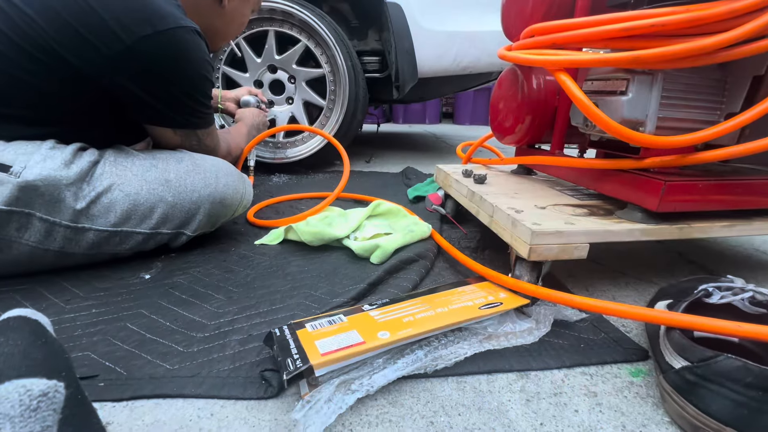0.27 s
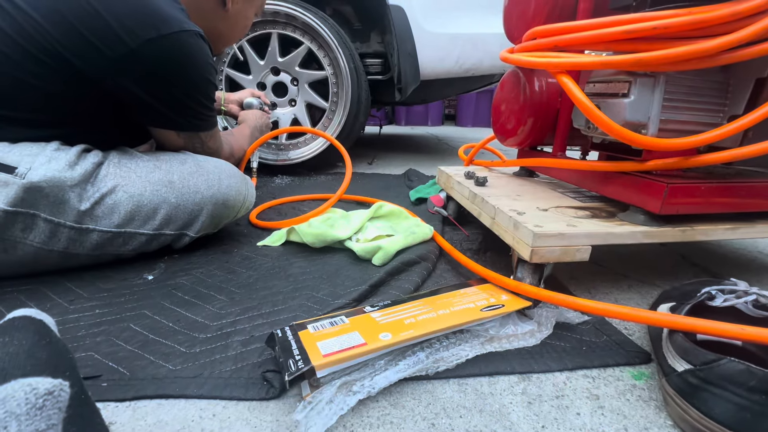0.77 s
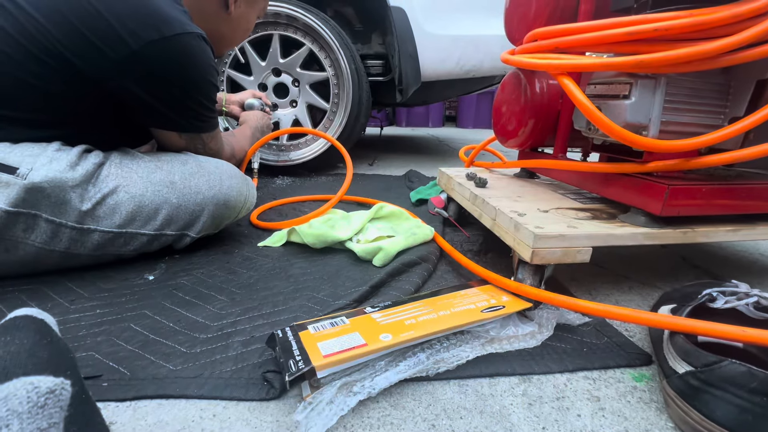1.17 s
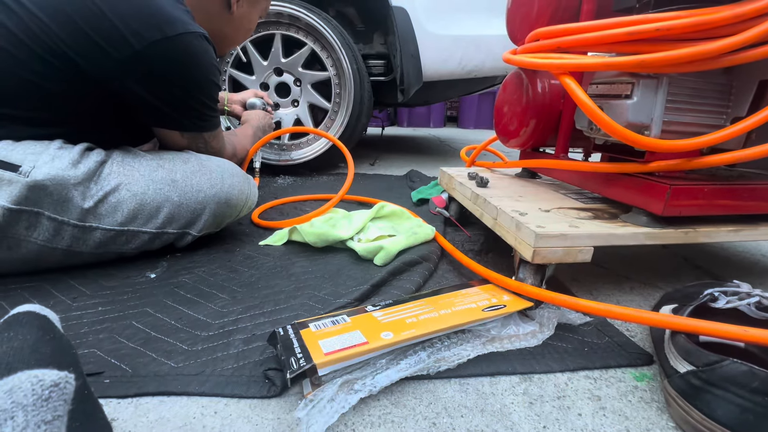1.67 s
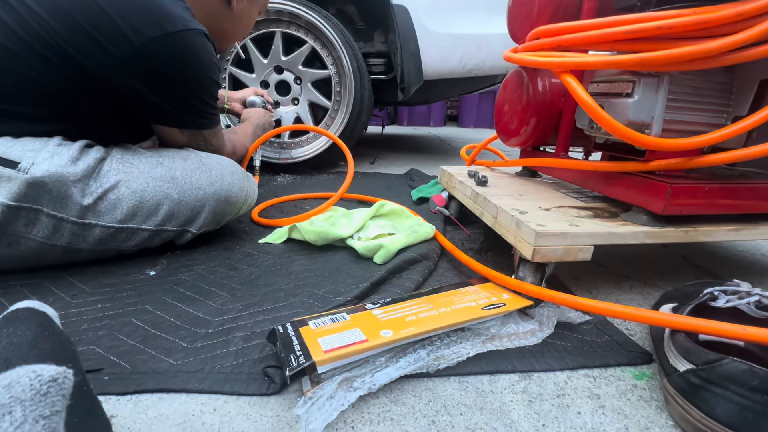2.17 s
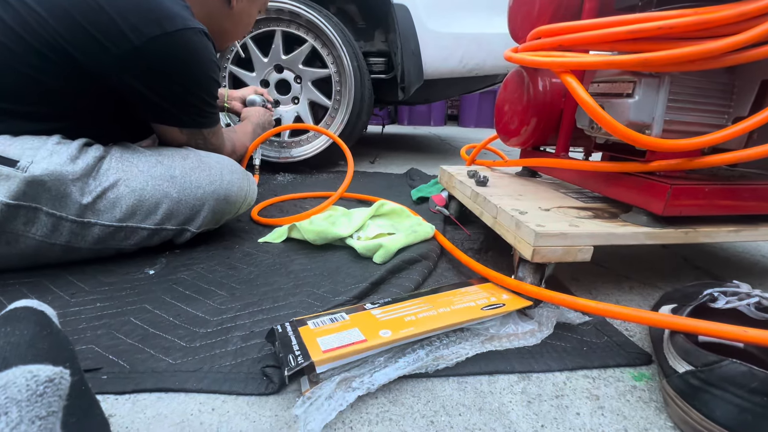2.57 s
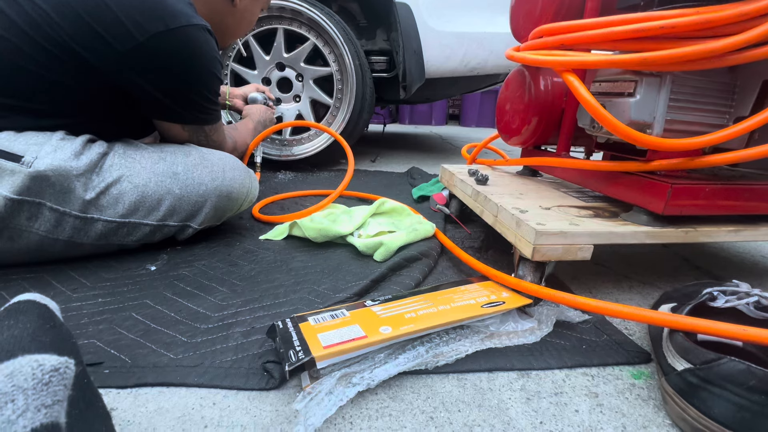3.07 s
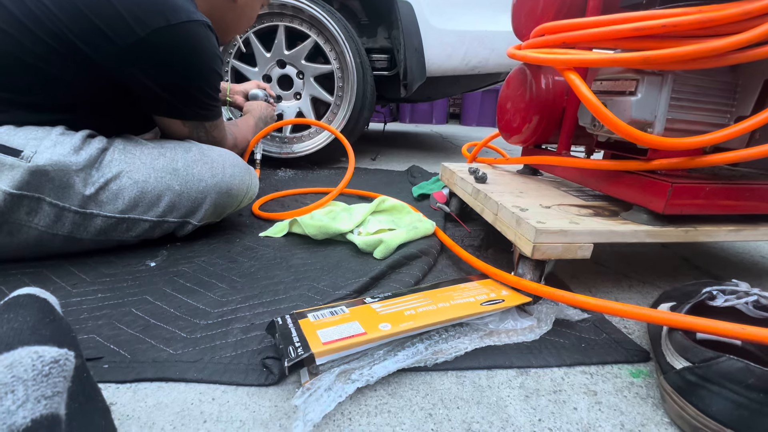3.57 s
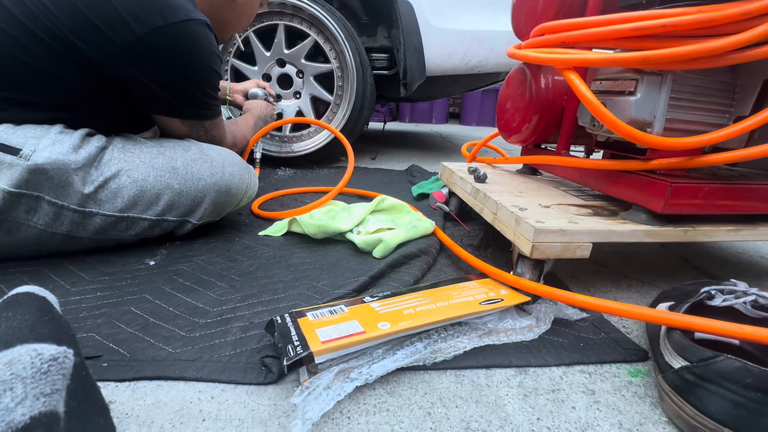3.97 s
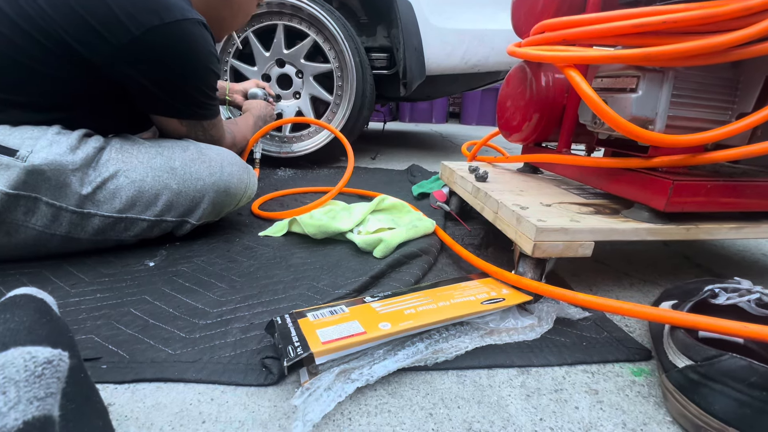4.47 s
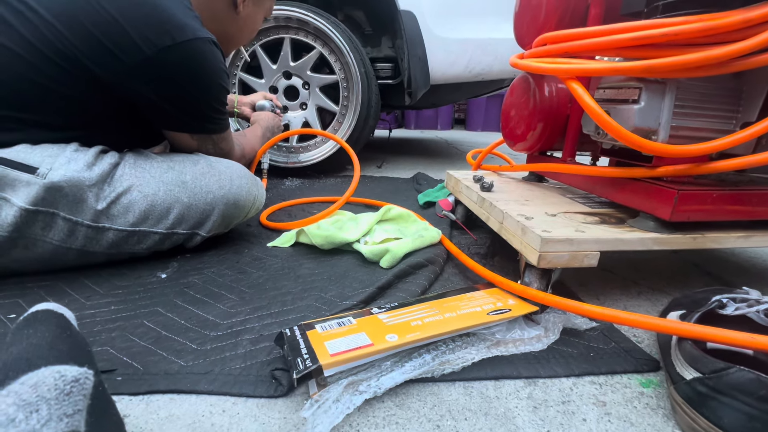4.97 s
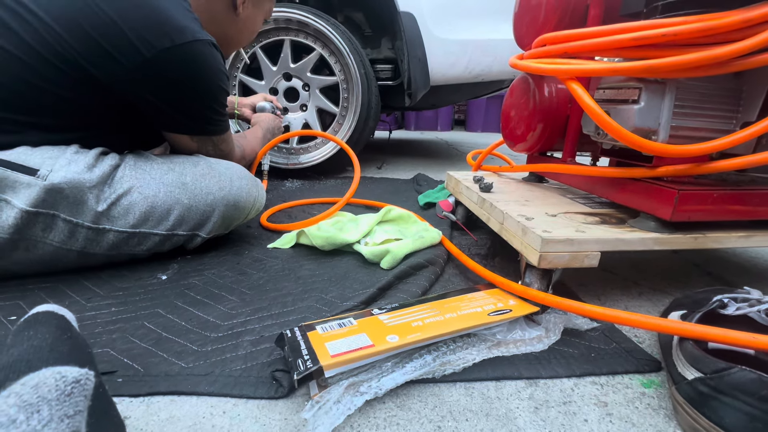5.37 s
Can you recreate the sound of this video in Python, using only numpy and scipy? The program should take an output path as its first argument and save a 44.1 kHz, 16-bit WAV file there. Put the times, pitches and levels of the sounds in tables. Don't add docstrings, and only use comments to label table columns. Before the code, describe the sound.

Fast, harsh metallic buzzing of a pneumatic tool on a car wheel, with hissing air, a short dip, and a motor hum beside it.

```python
import sys
import numpy as np
from scipy import signal
from scipy.fft import rfft, irfft, next_fast_len
from scipy.io import wavfile
from scipy.ndimage import uniform_filter1d

SR = 44100
rng = np.random.default_rng(int(sys.argv[2]) if len(sys.argv) > 2 else 0)


def bounce(signal):
    frames = np.transpose(np.atleast_2d(signal))
    limited = np.clip(frames, -1, 1)
    pcm = np.round(limited * 32767).astype(np.int16)
    wavfile.write(sys.argv[1], SR, pcm)


def gain_from_db(level_db):
    decades = np.asarray(level_db, float) / 20
    return 10 ** decades


N = 248283

# [start_s, level_db]
HAMMER_FORCE = [
    (0, -21.5),
    (.9, -20),
    (2.05, -21),
    (2.99, -20.5),
    (3.29, -32),
    (3.45, -24),
    (3.8, -22),
    (4.05, -23.5),
    (5.12, -21),
    (5.63, -21),
]
# [delay_s, level_db, hiss_decay_s]
BOUNCE_PATTERN = [
    (0, -2.5, 0.00038),
    (.0012, -2, 0.00039),
    (.0036, -6.5, 0.00042),
    (.0075, -2.5, 0.0016),
    (0.01, -10.5, 0.0062),
]


def evened(x):
    return x / np.sqrt(np.mean(x ** 2) + 1e-20)


def along(rows, column):
    rows = np.array(rows)
    return np.interp(np.arange(N) / SR, rows[:, 0], rows[:, column])


def read(points, hz):
    f, value = np.transpose(points)
    return np.interp(np.log(hz + 1), np.log(f + 1), value)


def shaped(x, points):
    size = next_fast_len(N)
    gain = gain_from_db(read(points, np.fft.rfftfreq(size, 1 / SR)))
    return irfft(rfft(x, size) * gain, size)[..., :N]


def ring(x, modes, steady=0):
    stroke_s = .018
    out = 0
    for k, (hz, width_hz, db) in enumerate(modes):
        r = np.exp(-np.pi * width_hz / SR)
        z = signal.lfilter([1 - r], [1, -r * np.exp(2j * np.pi * hz / SR)], x).real
        if steady:
            power = abs(uniform_filter1d(z ** 2, int(stroke_s * SR))) + 1e-12
            z = z * (power.mean() / power) ** (np.clip(steady, 0, 1) / 2)
        out = out + (-1) ** k * gain_from_db(db) * z
    return out


def scatter(decay_s):
    tails = rng.standard_normal((2, 4000)) * np.exp(-np.arange(4000) / SR / decay_s)
    return tails / np.linalg.norm(tails, axis=1, keepdims=True)


def blows(uneven_db=1.0):
    # [start_s, blows_per_s]
    hammer_speed = [(0, 45.85), (.252, 53.74), (.56, 52.63), (.857, 55.41), (1.48, 53.97), (1.801, 57.59),
                    (2.063, 54.32), (2.576, 59.16), (2.969, 59.9), (3.125, 40.37), (3.29, 33.29),
                    (3.458, 49.56), (3.751, 53.52), (4.061, 47.6), (4.322, 51.26), (5.124, 55.12),
                    (5.63, 55.8)]
    first_blow = .70
    strokes = np.floor(np.cumsum(along(hammer_speed, column=1)) / SR - first_blow)
    strikes = np.diff(strokes, prepend=strokes[0] - 1) > 0
    return strikes * gain_from_db(uneven_db * rng.standard_normal(N))


def bounce_hiss(clicks, leak_db=-20, spiky_db=1.5):
    t = np.arange(1600) / SR
    stroke = np.zeros(1600)
    for delay_s, db, fade_s in BOUNCE_PATTERN:
        stroke += gain_from_db(db) * (t >= delay_s) * np.exp(-np.maximum(t - delay_s, 0) / fade_s)
    gate = signal.oaconvolve(clicks, stroke)[:N] + gain_from_db(leak_db)
    grit = gain_from_db(spiky_db * evened(uniform_filter1d(rng.standard_normal(N), size=24)))
    return evened(gate * grit * rng.standard_normal((2, N)))


def bounce_taps(clicks):
    loose_s, loose_share = .00002, .012
    at = np.flatnonzero(clicks)
    taps = np.zeros(N + SR)
    for delay_s, db, _ in BOUNCE_PATTERN:
        late_s = delay_s + (loose_s + loose_share * delay_s) * rng.standard_normal(len(at))
        taps[at + abs(late_s * SR).astype(int)] += gain_from_db(db) * clicks[at]
    return taps[:N]


def loose_clatter(taps, hiss, decay_s=0.014, direct_db=-8.5, hiss_db=-6):
    # [pitch_hz, level_db]
    clatter_colour = [(600, -35.5), (1100, -4.5), (2000, -6), (2900, -25.5), (4600, 4), (5500, 0),
                      (7500, -4), (8400, -11.5), (10300, -5.5), (11400, -12.5), (12700, -3), (13800, -9.5),
                      (14500, -8), (15700, -10.5)]
    spread = signal.oaconvolve(taps[None], scatter(decay_s), axes=1)[:, :N]
    spread[0] += gain_from_db(direct_db) * taps
    spread = spread / spread.std(axis=1, keepdims=True)
    return shaped(spread + gain_from_db(hiss_db) * hiss, clatter_colour)


def metal_ring(taps, hiss, seat_s=.0012, hiss_db=-6):
    # [width_hz, level_db]
    wheel_pitches = [1648, 2196, 2642, 3100, 3290, 3590, 3935, 4388, 4745, 4985, 5206]
    wheel_modes = [(62, -11.5), (67, -8.5), (10.55, 6), (108, -11), (59, -12), (92, -7.5), (70, -8),
                   (58.6, -10), (59, -4.5), (49, -2), (50, -14.5)]
    # [width_hz, level_db]
    tool_pitches = [5910, 6300, 7000, 8113, 9158, 9810, 10300]
    tool_modes = [(71, -13.5), (83, -15), (100, -17), (40, -9), (44.4, -11.5), (170, -20.5), (370, -15)]
    pitches, shapes = wheel_pitches + tool_pitches, wheel_modes + tool_modes
    modes = [(hz, *shape) for hz, shape in zip(pitches, shapes)]
    seated = signal.oaconvolve(taps[None], scatter(seat_s), axes=1)[:, :N]
    return ring(evened(seated) + gain_from_db(hiss_db) * hiss, modes, steady=.6)


def rattle(clicks, clatter_db=-3):
    hiss = bounce_hiss(clicks)
    taps = bounce_taps(clicks)
    clatter = evened(loose_clatter(taps, hiss))
    rings = evened(metal_ring(taps, hiss))
    return gain_from_db(along(HAMMER_FORCE, column=1)) * evened(rings + gain_from_db(clatter_db) * clatter)


def exhaust(clicks):
    # [pitch_hz, width_hz, level_db]
    puff_modes = [
        (110, 144, -6.5),
        (246, 29.5, 7),
        (372, 12.4, -3.5),
        (589.6, 26.7, 4),
        (1790, 19, -24),
    ]
    puff_db, full_force_db = -36, -21
    puff_follows = 1
    level_db = puff_db + puff_follows * (along(HAMMER_FORCE, column=1) - full_force_db)
    return gain_from_db(level_db) * evened(ring(ring(clicks, puff_modes), [(360, 223, 0)]))


def compressor(waver_db=0.54):
    # [multiple_of_crank_speed, level_db]
    crank_tones = [(1, -8), (2, 0), (3, -7.5), (4, -2.5), (5, -2.5), (6, -25), (7, -0.5), (8, -4),
                   (9, -4.5), (10, -1), (11, -6.5), (12, -49), (13, -25), (14, -2.5), (15, -9.5),
                   (16, -6.5), (17, -13.5), (18, -16), (19, -19.5), (20, -28), (21, -25), (22, -23),
                   (23, -12.5), (24, -2), (25, -36), (26, -39), (27, -27)]
    # [pitch_hz, level_db]
    wash_colour = [(18, -38), (30, -27), (275, 7), (340, -6.5), (561, 10.5), (680, -6.5), (908, -10),
                   (1930, -8), (2620, -26), (3000, -51), (3900, -49), (6600, -120)]
    crank_hz, drone_db, wash_db = 56.305, -35.5, -41
    t, drone = np.arange(N) / SR, np.zeros(N)
    for multiple, db in crank_tones:
        drift = np.interp(t, np.linspace(0, t[-1], num=30), rng.standard_normal(30))
        tone = np.sin(2 * np.pi * (multiple * crank_hz * t + rng.random()))
        drone += gain_from_db(db + waver_db * drift) * tone
    wash = evened(shaped(rng.standard_normal((2, N)), wash_colour))
    return gain_from_db(drone_db) * evened(drone), gain_from_db(wash_db) * wash


def knocks():
    # [start_s, level_db, start_hz, end_hz, decay_s]
    floor_knocks = [
        (2.714, -32, 199, 60.5, 0.0099),
        (2.897, -18.5, 333, 70, 0.0093),
        (2.99, -32, 80, 51.4, 0.029),
    ]
    rise_s = 0.0013
    t, out = np.arange(6000) / SR, np.zeros(N + 6000)
    for start_s, db, start_hz, end_hz, decay_s in floor_knocks:
        hz = end_hz + (start_hz - end_hz) * np.exp(-2 * t / decay_s)
        shape = (1 - np.exp(-t / rise_s)) * np.exp(-t / decay_s)
        out[round(start_s * SR):][:6000] += gain_from_db(db) * shape * np.sin(2 * np.pi * np.cumsum(hz) / SR)
    return out[:N]


def ports(left, right, lead, lean_db):
    return np.array([left * gain_from_db(lean_db / 2), right * np.exp(-1j * lead) / gain_from_db(lean_db / 2)])


def scene():
    # [pitch_hz, likeness_0_to_1]
    likeness = [(60, 0.93), (250, 0.87), (600, 0.32), (2200, 0.9), (2640, 0.88), (2900, 0.52),
                (4000, 0.089), (4900, 0.68), (6000, 0.074), (7500, 0.44), (8300, 1), (9800, 1),
                (10800, 0.95), (12400, 0.81), (12900, 0.48), (14000, 1)]
    # [pitch_hz, lead_radians]
    TOP_LEAD = [(8400, 18.85), (9300, 20.5), (9700, 18.9), (10500, 21.9), (12350, 22), (13300, 25.1),
                (16100, 25.1)]
    # [pitch_hz, lead_radians]
    left_lead = [(0, 0), (300, 0), (400, 1.3), (560, .6), (1400, 3.4), (1650, 4.8), (1950, 3), (2200, 5.5),
                 (2640, 7.3), (2900, 9.3), (3150, 9.2), (3900, 11.4), (4700, 15.4), (6500, 15.4),
                 (8100, 19)] + TOP_LEAD
    # [pitch_hz, difference_db]
    hammer_lean = [(60, 18), (270, -3), (450, 4.5), (740, -1), (1220, 3), (2010, -3.5), (3330, 2),
                   (4400, 3), (4900, 6), (5500, 4.5), (9080, -0.5), (15000, 0)]
    # [pitch_hz, difference_db]
    drone_lean = [(60, -8), (300, 9), (400, -9), (560, 13.5), (700, 1), (800, -8), (1100, -13.5),
                  (1400, -3)]
    drone_lag_s, drone_lag_from_hz = 0.00175, 500
    clicks = blows()
    drone, wash = compressor()
    size = next_fast_len(N)
    hz = np.fft.rfftfreq(size, 1 / SR)
    near, reflected = rfft(rattle(clicks) + wash, size)
    puffs, drone = rfft(exhaust(clicks) + knocks(), size), rfft(drone, size)
    alike = np.clip(read(likeness, hz), 0, 1)
    blend = alike * near + np.sqrt(1 - alike ** 2) * reflected
    hammer_lead = np.interp(hz, *np.transpose(left_lead))
    hammer = ports(puffs + near, puffs + blend, hammer_lead, read(hammer_lean, hz))
    drone_lead = 2 * np.pi * np.maximum(hz - drone_lag_from_hz, 0) * drone_lag_s
    pump = ports(drone, drone, drone_lead, read(drone_lean, hz))
    return irfft(hammer + pump, size)[:, :N]


def top_cut(x):
    return signal.sosfilt(signal.butter(12, 16550, fs=SR, output="sos"), x)


def record(dry):
    edge_hz = 15800
    low_pass = signal.firwin(511, edge_hz, window=("kaiser", 9), fs=SR)
    limited = signal.oaconvolve(dry, low_pass[None], "same")
    return top_cut(limited)


dry = scene()
out = record(dry)
bounce(out)
```